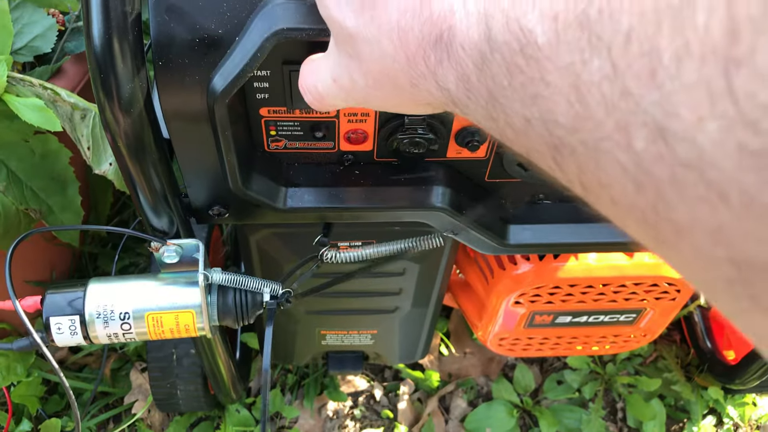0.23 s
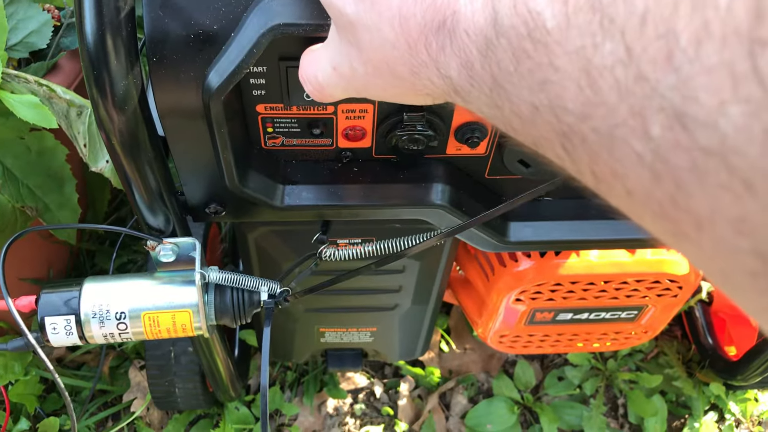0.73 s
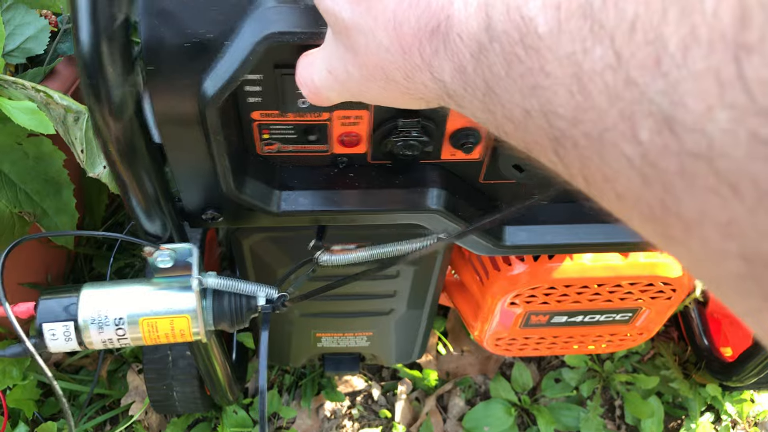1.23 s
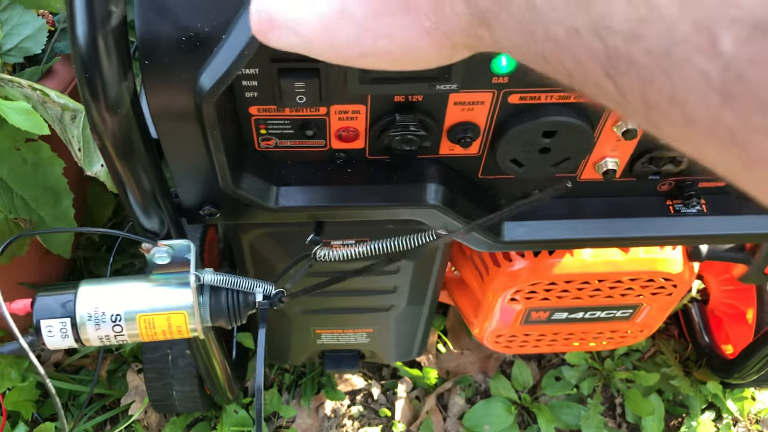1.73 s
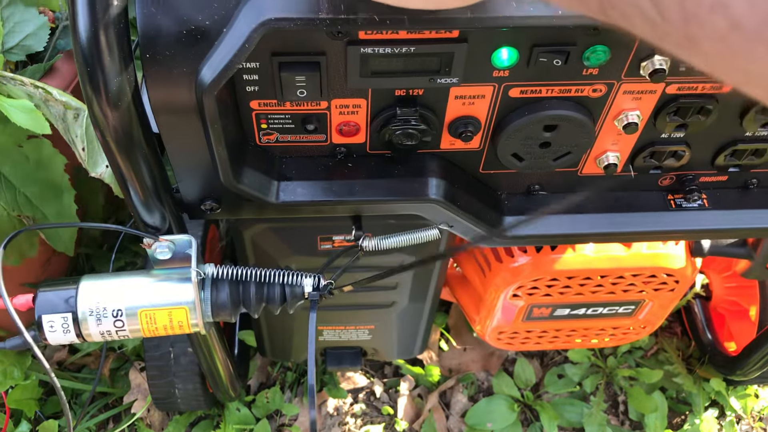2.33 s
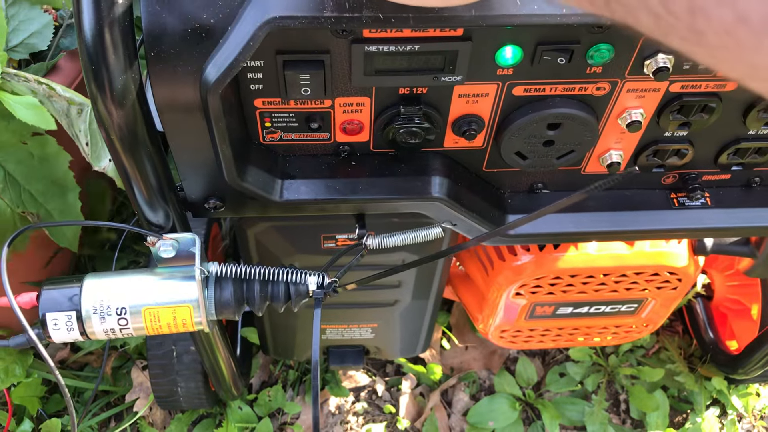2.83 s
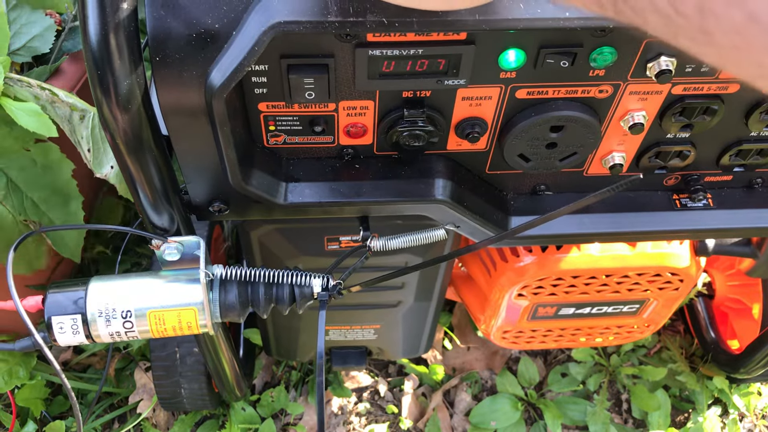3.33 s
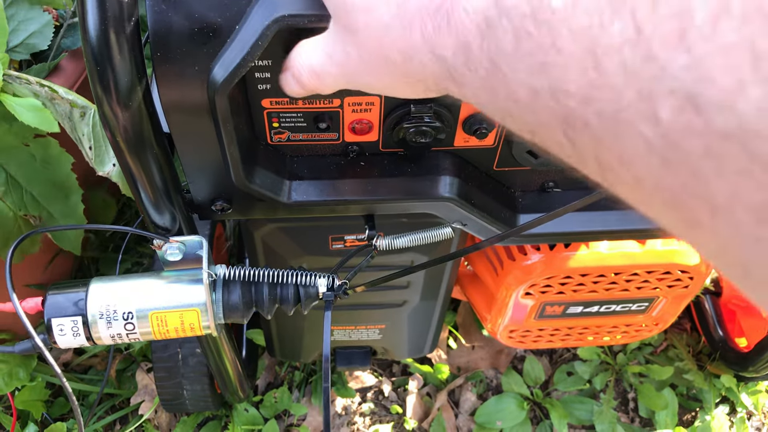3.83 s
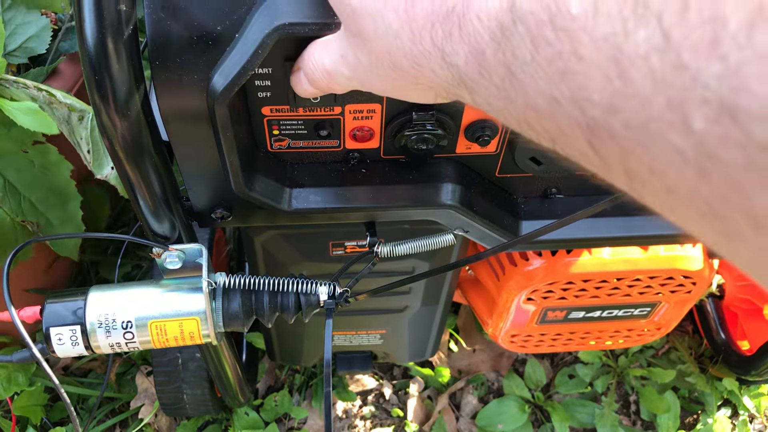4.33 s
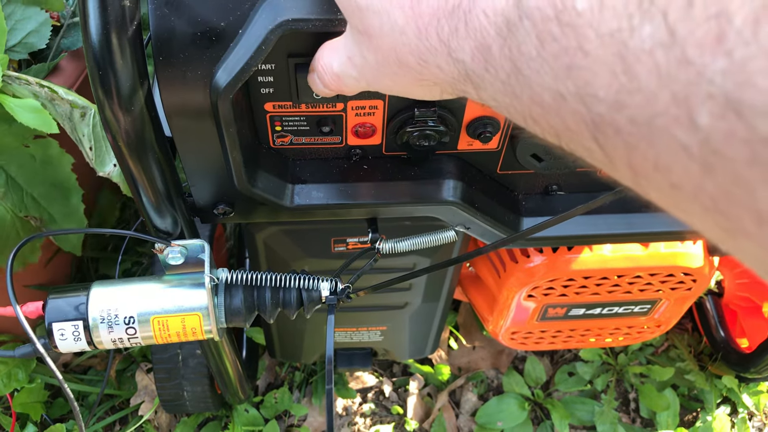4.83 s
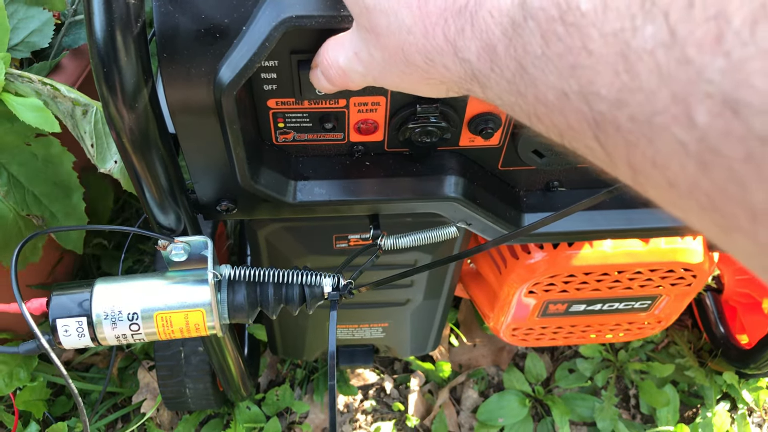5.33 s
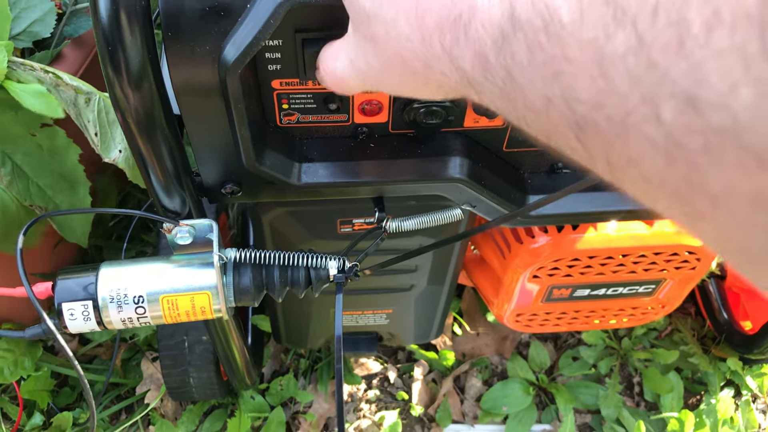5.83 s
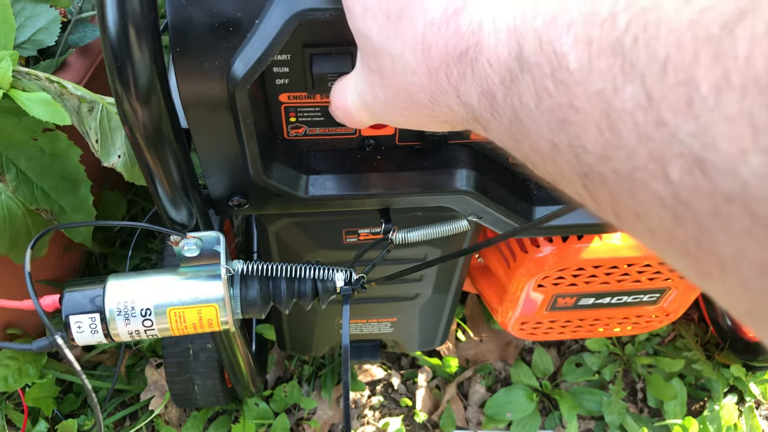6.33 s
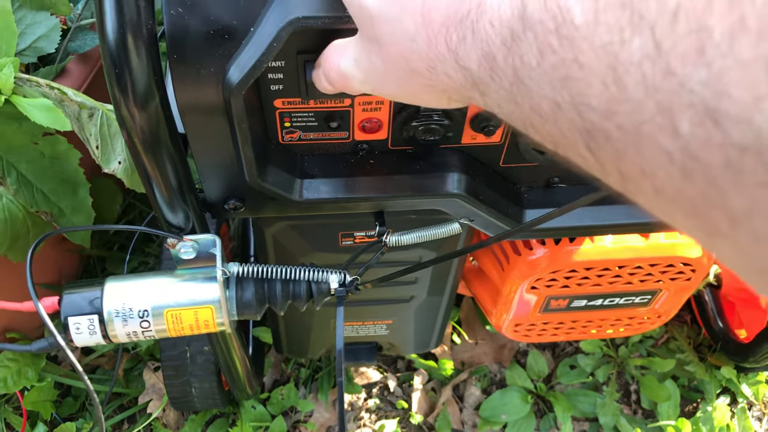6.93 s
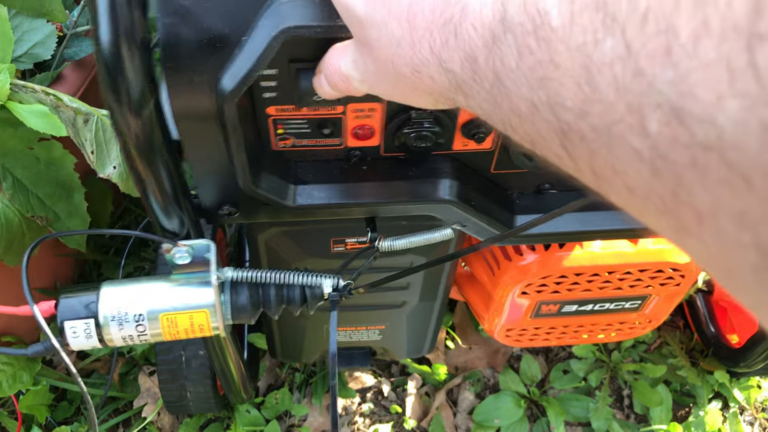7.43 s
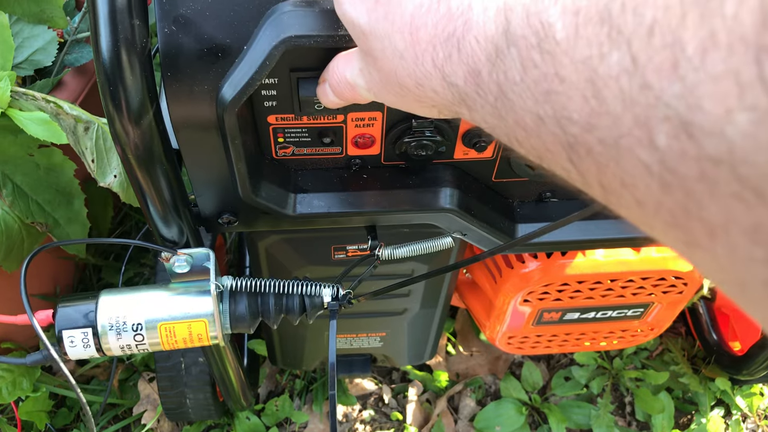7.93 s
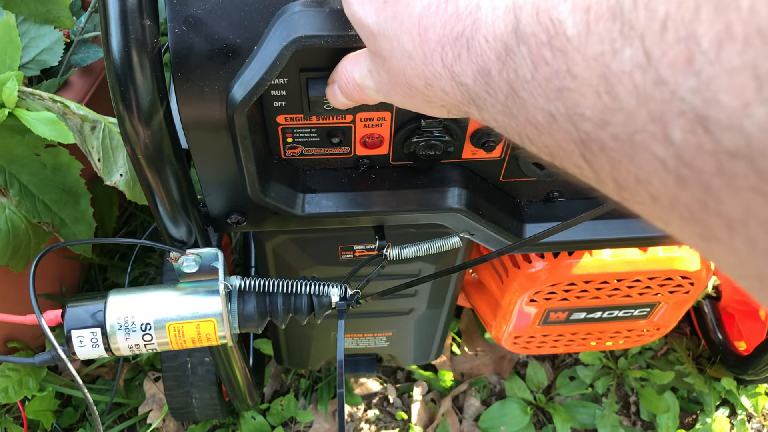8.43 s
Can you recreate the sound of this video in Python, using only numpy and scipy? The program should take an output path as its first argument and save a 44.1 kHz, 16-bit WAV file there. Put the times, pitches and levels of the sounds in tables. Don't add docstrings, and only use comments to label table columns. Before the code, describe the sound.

Soft outdoor air for a tenth of a second, then hard metallic clacks and ringing parts from 0.12 to 0.25 s as a starter engages close by. Its rough gear whine climbs quickly and grinds until 0.93 s, sagging roughly five times a second on compressions, with dull puffs and clanks. The starter lets go, a freed gear sings briefly, and a thump lands near 1.1 s. From 1.2 s uneven firings catch and speed up into a loud, barking, rattling rev. At 1.94 s the level abruptly collapses to very quiet; the engine surges faintly, then settles into an even chug of about 31 beats per second, with rumble, casing rattle and faint fan whistle. Switched off around 5.8 s, it coasts, its gulps slowing and separating, shrill tiny squeaks at 6.4-7.1 s, stopping by 7.9 s. Faint low wind gusts continue to 8.6 s.

```python
import sys
import numpy as np
from scipy import signal
from scipy.fft import rfft, irfft, next_fast_len
from scipy.io import wavfile
from scipy.ndimage import uniform_filter1d

SR = 44100
rng = np.random.default_rng(int(sys.argv[2]) if len(sys.argv) > 2 else 0)


def how_loud(loudness_db):
    steps = np.asarray(loudness_db, float) / 20
    return 10 ** steps


def materialize(psi):
    bounded = np.clip(np.atleast_2d(psi).T, -1, 1)
    quanta = np.round(bounded * 32767).astype(np.int16)
    wavfile.write(sys.argv[1], SR, quanta)


N = 382788
T = np.arange(N) / SR

# (start s, length of the change s)
RELEASE, FREEWHEEL_ENDS = (.93, .014), (1.2, .2)
CATCH, GOVERN, SWITCH_OFF = (1.1, .2), (1.8, .25), (5.77, .3)
FADE, FADE_DB = (1.936, .016), -43
LOWERED = T > sum(FADE)


def evened(x):
    return x / np.sqrt(np.mean(x ** 2) + 1e-20)


def curves(rows):
    s, *columns = np.transpose(rows)
    return [np.interp(T, s, c) for c in columns]


def ramp(start, length):
    return np.clip((T - start) / length, 0, 1)


def lifted(rows):
    rows = np.array(rows, float)
    return np.c_[rows[:, 0], rows[:, 1:] - FADE_DB * (rows[:, :1] > sum(FADE))]


def colour(x, points, peaks=()):
    size = next_fast_len(len(x))
    hz = np.fft.rfftfreq(size, 1 / SR)
    f, db = np.transpose(points)
    shape_db = np.interp(np.log(hz + 1), np.log(f + 1), db, left=-90)
    shape_db += sum(d / (1 + (2 * (hz - p) / w) ** 2) for p, w, d in peaks)
    return evened(irfft(rfft(x, size) * how_loud(shape_db), size)[:len(x)])


def resonate(x, modes):
    out = 0
    for f, width_hz, db in modes:
        peak = signal.iirpeak(f, f / (2.4 * width_hz), SR)
        out = out + how_loud(db) * signal.lfilter(*peak, signal.lfilter(*peak, x))
    return out


def drift(rate_hz):
    coarse = rng.standard_normal(N // 32 + 2)
    coarse = signal.sosfilt(signal.butter(2, rate_hz, fs=SR / 32, output="sos"), coarse)
    return np.interp(np.arange(N) / 32, np.arange(len(coarse)), evened(coarse))


def add(mix, s, sound):
    part = mix[round(s * SR):][:len(sound)]
    part += sound[:len(part)]


def burst(t60, swell):
    t = np.arange(round(.15 * SR)) / SR
    return np.minimum(t / max(swell, 1e-4), 1) * how_loud(-60 * np.maximum(t - swell, 0) / t60)


def fuzzy(hz, rough, width_hz):
    shake = 1 - rough + rough * (drift(width_hz) + 1j * drift(width_hz)) / np.sqrt(2)
    return np.sqrt(2) * (shake * np.exp(2j * np.pi * np.cumsum(hz) / SR)).real


def chime(modes, rough):
    return evened(sum(how_loud(db) * fuzzy(np.full(N, f), rough, w / 2) for f, w, db in modes))


# f/Hz, level/dB (per Hz)
AIR = [
    [(18, -35.5), (30, -10), (114, -1), (324, -15.5), (360, -17.5), (693, -13), (1730, -23.5),
     (2080, -26.5), (2310, -22), (3510, -43.5), (15600, -59)],
    [(18, -33), (30, 2.5), (90, -0.5), (231, -8.5), (333, -8.5), (468, -15), (1230, -16.5), (1690, -20.5),
     (4560, -26), (4930, -27.5), (9000, -29), (9500, -25), (10200, -34.5), (15600, -30)],
]
# t/s, level/dB
GUSTS = [
    (6.979, -65),
    (7.499, -60),
    (7.619, -57),
    (7.699, -72),
    (8.249, -55),
    (8.499, -59),
    (8.579, -60),
]


def garden():
    noise = rng.standard_normal((3, N))
    early = how_loud(-41.5 + 1.7 * drift(30)) * colour(noise[0], AIR[0])
    late = how_loud(-67 + drift(6)) * colour(noise[1], AIR[1])
    lumps = np.zeros(N)
    for s, db in GUSTS:
        add(lumps, s - .01, how_loud(db - 5.5) * burst(t60=.21, swell=.012))
    late += lumps * evened(resonate(noise[2], [(70, 19, 10), (130, 80, -31)]))
    return np.where(T < sum(FADE), early, late / how_loud(FADE_DB))


def squeaks(turns):
    start_s, end_s, place_in_cycle, level_db, hz = 6.44, 7.13, .1, -68.5, 3290
    out, t = np.zeros(N), T[:round(.016 * SR)]
    times = T[1:][np.diff(np.floor(turns - place_in_cycle)) > 0]
    for s in times[(times > start_s) & (times < end_s)]:
        size, pitch, *grain = rng.standard_normal(len(t) + 2)
        rasp = 1 + .35 * uniform_filter1d(grain, size=12) * 3.5
        tone = np.sin(2 * np.pi * hz * (1 + .018 * pitch) * t)
        gain = how_loud(level_db + 1.3 * size - 6 - FADE_DB)
        add(out, s - .003, gain * np.hanning(len(t)) * rasp * tone)
    return out


# t/s, f/Hz, level/dB, t60/s, swell/s
PINGS = [(0.134, 1114, -16, 0.068, .007), (.133, 6400, -44, 0.055, .004), (0.133, 8200, -46.5, 0.034, .003),
         (.153, 2675, -17, 0.033, .006), (.158, 559.7, -22, .08, .004), (0.173, 1150, -17.5, 0.1, .006),
         (0.197, 1390, -20, .08, .003), (.204, 800, -14, 0.071, .004), (0.2138, 2400, -10, .03, .001),
         (.2135, 1300, -11.5, .06, .001), (.214, 4300, -26, 0.027, .001), (.214, 9530, -44, .06, .002),
         (.216, 229.6, -31, .45, .008), (0.33, 1260, -20, 0.041, .003), (.451, 794, -21, .05, .003),
         (.491, 785, -20, 0.084, .003), (.532, 766, -11.5, 0.041, .002), (.533, 4000, -33.5, 0.033, .002),
         (.745, 854, -18, 0.034, .002), (.778, 2610, -23.5, .04, .002), (.778, 2130, -21, 0.043, .003),
         (1.02, 788, -21.5, 0.025, .005), (1.097, 1290, -17, 0.06, .004), (1.12, 743, -21, 0.072, .004),
         (1.203, 7900, -50, .06, .003), (1.258, 5560, -49.5, 0.13, .004), (1.33, 2780, -25.5, 0.072, .005),
         (1.351, 2866, -20, 0.1, .004), (1.356, 6400, -39, .07, .003), (1.36, 5230, -42, 0.14, .004),
         (1.48, 6350, -31, 0.072, .004), (1.53, 6370, -34.5, .09, .004), (1.575, 6530, -38, .08, .004),
         (1.618, 6300, -38.5, 0.056, .004), (1.7, 6500, -38.5, .07, .004)]


def pings():
    out = np.zeros(N)
    for s, hz, db, t60, swell in PINGS:
        shape = burst(t60, swell)
        shape = shape * np.hanning(2 * len(shape))[len(shape):]
        turn = 2 * np.pi * hz * T[:len(shape)]
        add(out, s, how_loud(db) * shape * (np.sin(turn) + .4 * np.sin(1.035 * turn)))
    return out


# t/s, tooth rate f/Hz, level/dB, roughness (0-1)
WHINE = [(.235, 1185, -35, .7), (.262, 1222, -23, .4), (.3, 1250, -29, .45), (.345, 1528, -30, .55),
         (.4, 1700, -32, .6), (.46, 1860, -34, .8), (.527, 1930, -30, .8), (.607, 2035, -32, .8),
         (.697, 2075, -31, .8), (.725, 1990, -33, .85), (.777, 2065, -32, .85), (.86, 2190, -30, .8),
         (.94, 2050, -33, .85)]
# t/s, f/Hz, level/dB
SONGS = [
    [(1.0, 3290, -60), (1.024, 3410, -49), (1.218, 3530, -52), (1.242, 3569, -50), (1.254, 3750, -59),
     (1.26, 3690, -76)],
    [(1.47, 2554, -37), (1.508, 2383, -29), (1.532, 2490, -27.5), (1.632, 2620, -36), (1.64, 2500, -33)],
    [(1.07, 365, -50), (1.105, 365, -27), (1.15, 365, -36), (1.2, 365, -49.5)],
    [(.78, 1150, -39.5), (.85, 1152, -32), (1.0, 1150, -29.5), (1.03, 1150, -42)],
]
# t/s, level/dB, clang level/dB, treble level/dB, ring t60/s
BLOWS = [(0.122, -23.5, -8.5, -24.5, 0.046), (0.133, -19.5, -8, -16, 0.053), (0.155, 0, -15, -29, 0.06),
         (0.175, -14.5, -13.5, -27.5, 0.075), (0.2125, -6.5, -9, -21, 0.093),
         (0.26, -20, -21.5, -26, 0.028), (0.383, -15, -23, -27.5, 0.046), (0.531, -11, -9, -26, 0.054),
         (0.747, -14.5, -4.5, -23.5, 0.036), (1.078, 1, -18.5, -33.5, 0.063),
         (1.098, -14, -22.5, -40.5, 0.1), (1.352, -14, -3, -22, 0.16)]
# f/Hz, width/Hz, level/dB
BELL = [(250, 63, -18), (365, 30, -11), (515.5, 190, -14), (751, 240, 4), (966, 220, 1.5), (1150, 410, 0.5),
        (1447, 400, -10)]
CLANG = [(2054, 470, 1.5), (2633, 170, 0.5), (2890, 280, -6)]


def starter():
    hz, db, rough = curves(WHINE)
    climb_khz = (hz - WHINE[0][1]) / 1000
    levels = db, db - 1 - 29 * climb_khz, db - 13 - 60 * climb_khz
    on = ramp(WHINE[0][0], .016) * (1 - ramp(*RELEASE))
    out = np.zeros(N)
    for k, level_db in enumerate(levels, 1):
        out += on * how_loud(level_db + 3) * fuzzy(k * hz, rough=rough, width_hz=60 + 30 * k)
    out += on * ramp(.45, .12) * how_loud(db - 7) * fuzzy(hz - 150, rough=.7, width_hz=50)
    for rows in SONGS:
        hz, db = curves(rows)
        singing = (T > rows[0][0]) * (T < rows[-1][0])
        out += singing * how_loud(db + 2.5) * fuzzy(hz, rough=.3, width_hz=8.3)
    ring, clang, crack = np.zeros((3, N))
    swell_s = .0075
    for s, db, clang_db, treble_db, t60 in BLOWS:
        add(ring, s, how_loud(db - 7.5) * burst(t60, swell_s))
        add(clang, s, how_loud(db + clang_db - 4.5) * burst(.86 * t60, .7 * swell_s))
        add(crack, s, how_loud(db + treble_db) * burst(.9 * t60, .58 * swell_s))
    out += ring * chime(BELL, rough=.4) + clang * chime(CLANG, rough=1)
    return out + crack * colour(rng.standard_normal(N), HISS, SHELL)


def rattle_levels(effort_db):
    tooth_db = 20 * np.log10(curves(WHINE)[0] / 2000)
    speed_db = 20 * np.log10(curves(SPEED)[0] / 31)
    engaged = ramp(.11, .07) * (1 - ramp(*RELEASE))
    free = ramp(*RELEASE) * (1 - ramp(*FREEWHEEL_ENDS))
    first_s, period_s, recovery_s = .515, .212, .03
    stall = np.exp(-((T - first_s) % period_s) / recovery_s) * (T > first_s)
    grind = engaged * how_loud(-24.5 + .62 * tooth_db - 1.5 * stall) + free * how_loud(-27.5)
    near_stop_db = 6.5 * ramp(6.9, .4)
    body = np.hypot(grind, how_loud(-6 + near_stop_db + effort_db + .08 * speed_db))
    grind_fizz = engaged * how_loud(-42.5 + 1.2 * tooth_db - 11.7 * stall) + free * how_loud(-53.5)
    engine_fizz_db = np.where(LOWERED, -21, -35) + .49 * effort_db + 1.1 * speed_db
    return body, np.hypot(grind_fizz, how_loud(engine_fizz_db))


# f/Hz, level/dB (per Hz)
CASING = [
    [(240, -40.5), (400, -13.5), (537, -19.5), (781, 1.5), (1290, -1.5), (1730, -18), (1930, -10),
     (2570, -8), (4200, -34.5), (5460, -58.5), (9240, -120)],
    [(240, -30.5), (400, -8), (527, -13.5), (796, 1), (879, -11), (1130, -7), (1700, -18), (2470, -14),
     (4200, -47.5), (5460, -65.5), (9240, -120)],
    [(240, -24), (400, -6), (641, -9), (758, 0.5), (951, -7), (1070, -19), (1910, -18), (2110, -16.5),
     (2450, -18), (2920, -25), (4200, -22), (5460, -48.5), (9240, -120)],
]
# f/Hz, width/Hz, level/dB
PANELS = [(730, 29, 3.4), (880, 39, 3), (1150, 21, 3.1), (1320, 98, 3.5), (2170, 210, 2), (2500, 59, 3.5),
          (2700, 110, 3)]
# f/Hz, level/dB (per Hz)
FIZZ = [
    [(1760, -29.5), (3000, -2.5), (3370, -17), (3790, -9.5), (4440, -18.5), (6270, -11.5), (7660, -23.5),
     (8740, -17.5), (10200, -26), (11100, -24.5), (15600, -38.5)],
    [(1760, -64), (3000, -9), (3610, -11.5), (4060, 1), (4790, -10), (5210, -5), (7350, -8), (8210, -4),
     (10500, -11.5), (13100, -14.5), (15600, -13.5)],
]
# f/Hz, width/Hz, level/dB
SHELL = [(3620, 300, 5.4), (4460, 270, 1.4), (6350, 480, 4.1), (8540, 360, 3.7), (11700, 390, 1.2)]
HOUSING = [(3650, 70, 8.5), (4630, 70, 4), (5160, 150, 3), (5600, 31, 7), (6260, 220, 6), (7200, 70, 4),
           (8490, 60, 10), (9200, 90, 4), (10500, 200, -8.5), (11110, 410, 4.5)]


def casing(turns, body_gain, fizz_gain):
    off = ramp(*SWITCH_OFF)
    gating = .45 * ramp(*CATCH) - .27 * ramp(*GOVERN) + .27 * off + .2 * ramp(6.1, .7)
    beat = np.exp(-((turns + .2 - .3 * off) % 1) / .2)
    throb = 1 - gating + gating * 2.5 * beat
    knocks = rng.standard_normal((2, N)) * how_loud(np.array([2.1 * drift(330), 1.7 * drift(250)]))
    revving = ramp(1.15, .14)
    crank, rev, run = (colour(knocks[0], c, p) for c, p in zip(CASING, (PANELS, PANELS[3:], PANELS)))
    body = np.where(LOWERED, run, (1 - revving) * crank + revving * rev)
    fizz = np.where(LOWERED, colour(knocks[1], FIZZ[1], SHELL), colour(knocks[1], FIZZ[0], HOUSING))
    whistle = np.cos(2 * np.pi * 68 * turns + .7 * drift(35)) * (T > 2.3) * (T < 6.02)
    fan = how_loud(-82.5 - FADE_DB + 3.5 * drift(25)) * whistle
    return body_gain * body * throb ** .4 + fizz_gain * fizz * throb + np.sqrt(2) * fan


# t/s, hiss level/dB, thump level/dB, casing knock level/dB
FIRES = [(1.2056, -39.5, -41, -29.5), (1.259, -33.5, -13.5, -72), (1.3276, -35, -14, -38.5),
         (1.3558, -26.5, -12, -42), (1.4252, -21.5, -16.5, -19.5), (1.4815, -23, -24, -15),
         (1.5294, -27, -22.5, -18), (1.5723, -25.5, -5.5, -14), (1.6153, -24, -8.5, -16),
         (1.6972, -24.5, -8, -14), (1.7798, -22, -8, -10.5), (1.8572, -22.5, -10, -12.5),
         (1.9299, -30.5, -7.5, -14.5), (2.0068, -61.5, -58, -73), (2.0832, -62, -70, -79),
         (2.1201, -59.5, -62, -75), (2.1563, -61.5, -54, -78), (2.1854, -61, -55, -74)]
# middle t/s, level/dB, f/Hz
PUFFS = [(.198, -34, 85), (.26, -38, 80), (.31, -34.5, 130), (.385, -43, 101), (.46, -34, 95),
         (.495, -29.5, 75), (.553, -31.5, 143), (.566, -31, 65), (.61, -39, 80.5), (.66, -33, 75),
         (.705, -29.5, 75), (.765, -30.5, 147), (.778, -38, 65), (.82, -30.5, 70), (.91, -27.5, 70),
         (.953, -32.5, 160), (.956, -26, 70), (1.005, -36, 110), (1.06, -32, 84.5), (1.093, -28, 75),
         (1.13, -26.5, 191), (1.137, -18.5, 70), (1.178, -33, 75), (1.265, -20.5, 70)]
# f/Hz, width/Hz, level/dB
PIPE = [(58, 10.17, -5.5), (248, 27, -5.5)]
# f/Hz, level/dB (per Hz)
HISS = [(1760, -26), (3000, 2.5), (3370, -15.5), (3850, -9.5), (4350, -17), (5430, -15), (6100, -14.5),
        (15600, -32)]


def firings():
    spit, kicks, knock, puffs = np.zeros((4, N))
    bark = burst(t60=.11, swell=.0016) * np.sin(2 * np.pi * 120 * T[:round(.15 * SR)])
    for s, hiss_db, thump_db, knock_db in lifted(FIRES):
        add(spit, s, how_loud(hiss_db - 4) * burst(t60=.12, swell=.004))
        add(kicks, s + .00065, how_loud(thump_db + 1) * np.hanning(260))
        add(puffs, s - .001, how_loud(thump_db + 3.5) * bark)
        add(knock, s - .004, how_loud(knock_db - 1) * burst(t60=.11, swell=.0023))
    puff_s = .036
    t = T[:round(puff_s * SR)]
    for s, db, hz in PUFFS:
        tone = np.sin(2 * np.pi * hz * (t - puff_s / 2))
        add(puffs, s - puff_s / 2, how_loud(db + 3.5) * np.hanning(len(t)) * tone)
    low = resonate(kicks, PIPE) + puffs
    noise = rng.standard_normal(N)
    hiss = np.where(LOWERED, colour(noise, FIZZ[1], SHELL), colour(noise, HISS, SHELL))
    return spit * hiss + low + knock * colour(rng.standard_normal(N), CASING[1])


# t/s, cycle rate f/Hz
SPEED = [(1.2, 9.96), (1.398, 14.8), (1.456, 16), (1.51, 21.2), (1.598, 23.9), (1.75, 25.2), (1.952, 26.3),
         (2.094, 27.8), (2.2, 31.0), (2.286, 30.5), (2.4, 30.87), (5.7, 30.9), (5.9, 31.0), (7.15, 11.3),
         (7.5, 7.4), (7.9, 3)]


def cycles():
    turns = np.cumsum(curves(SPEED)[0] * (1 + .00064 * drift(3))) / SR
    first, last = np.interp([1.713, 5], T, turns)
    slip = (last - first + .5) % 1 - .5
    return turns - first - np.interp(T, [2.5, 5.5], [0, slip])


def orders(turns, table_db, share_db, scatter, waver_db, lag):
    heard = share_db > -45
    waver = [how_loud(waver_db * drift(6.7)[heard]) for k in range(3)]
    phase = scatter * rng.standard_normal(len(table_db)) - lag
    out = np.zeros(N)
    for k, db in enumerate(table_db, 1):
        out[heard] += how_loud(db) * waver[k % 3] * np.cos(2 * np.pi * k * turns[heard] + phase[k - 1])
    return how_loud(share_db) * out / np.sqrt(np.sum(how_loud(np.array(table_db)) ** 2) / 2)


def echoed(x):
    delay, smear = round(.0128 * SR), round(.0016 * SR)
    once = how_loud(-8) * uniform_filter1d(np.roll(x, delay), size=smear)
    twice = how_loud(-8) * uniform_filter1d(np.roll(once, delay), size=smear)
    return how_loud(-2) * (x + once + twice)


GOVERNED_DB = [-20.5, 3.5, -12, -4, 2.5, -7.5, -25, -1.5, -27, -10, -17.5, -11.5, -19, -8, -7.5, -48, -38.5,
               -13.5, -11, -21, -17, -6, -21, -30, -5.5, -19.5, -11, -20.5, -17, -4.5]
CATCHING_DB = [-30, -1, -6, -12, -1, -3.5, -9, -11, -5, -7, -13.5, -11.5, -12, -18, -14, -15.5, -20, -21]
COASTING_DB = [-27.5, -7.5, -1.5, -7, -10, -10, -2.5, -10, -7, -4, -9, -12, -11, -15, -17, -13, -16, -14,
               -18, -19]
# f/Hz, level/dB (per Hz)
RUMBLE = [(15, -37), (25, -10), (48, 0), (125, -2), (184, -8.5), (230, -3.5), (505, -16.5), (600, -17.5),
          (780, -48.5), (1320, -120)]


def breathing(turns, level_db):
    catch, govern, off, rest = ramp(*CATCH), ramp(*GOVERN), ramp(*SWITCH_OFF), ramp(6.95, .6)
    unfired = ramp(sum(SWITCH_OFF) - .18, .37)
    slowing = ramp(6.4, .71)
    governed_db = -1.2 - 50 * ((1 - govern) ** 2 + unfired)
    catching_db = -1.5 - 50 * ((1 - catch) ** 2 + govern ** 3)
    coasting_db = -.2 - 3 * slowing - 50 * ((1 - off) ** 2 + rest ** 2)
    beats = orders(turns, GOVERNED_DB, governed_db, scatter=1, waver_db=2, lag=.81)
    gulps = echoed(orders(turns, CATCHING_DB, catching_db, scatter=.38, waver_db=.8, lag=1.798))
    gulps += orders(turns, COASTING_DB, coasting_db, scatter=.6, waver_db=.4, lag=1.3)
    gulps += slowing * how_loud(-6 - 110 * rest ** 2) * np.sqrt(2) * np.sin(2 * np.pi * 7 * turns)
    rumble_db = -6 * catch - 10 * ramp(sum(CATCH), .3) + 6.5 * govern - 13 * off + 17 * rest
    rumble = colour(rng.standard_normal(N), RUMBLE) * how_loud(drift(12))
    return how_loud(level_db) * (beats - gulps + how_loud(rumble_db) * rumble)


# t/s, effort level/dB
EFFORT = [(.13, -42), (.95, -45), (1.05, -37.5), (1.24, -31), (1.42, -14), (1.5, -12.5), (1.93, -14),
          (2.02, -23), (2.16, -8), (2.25, -14.5), (2.6, -16), (5.85, -16.5), (6.0, -13), (6.15, -12),
          (6.7, -17), (7.0, -19.5), (7.3, -27), (7.95, -29)]


def scene():
    effort_db = curves(EFFORT)[0]
    turning = ramp(.128, .01) * (1 - ramp(EFFORT[-1][0] - .12, .11))
    turns = cycles()
    engine = turning * (breathing(turns, effort_db) + casing(turns, *rattle_levels(effort_db)))
    return (garden() + squeaks(turns) + pings() + starter() + firings() + engine)[None]


def band_limit(x):
    return signal.sosfilt(signal.butter(12, 15740, fs=SR, output="sos"), x)


def record(dry):
    faded = dry * (how_loud(FADE_DB) + (1 - ramp(*FADE)) ** 3)
    cut = signal.sosfilt(signal.butter(4, 37, "high", fs=SR, output="sos"), faded)
    capped = .93 * np.tanh(cut / .89 + (cut / 1.3) ** 3 / 3)
    edge = signal.firwin(255, 15700, fs=SR)[None]
    return band_limit(signal.oaconvolve(capped, edge, "same"))


dry = scene()
out = record(dry)
materialize(out)
```